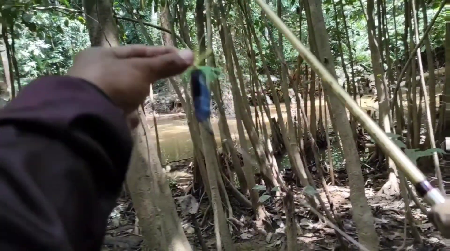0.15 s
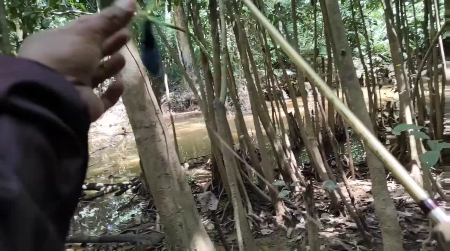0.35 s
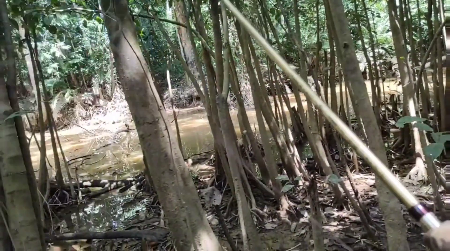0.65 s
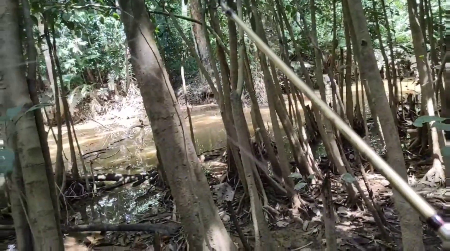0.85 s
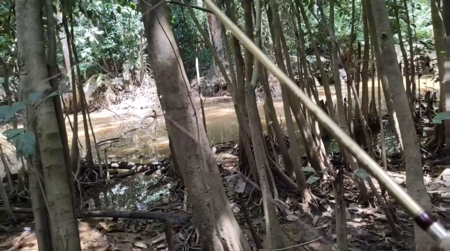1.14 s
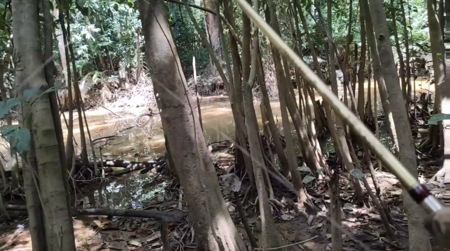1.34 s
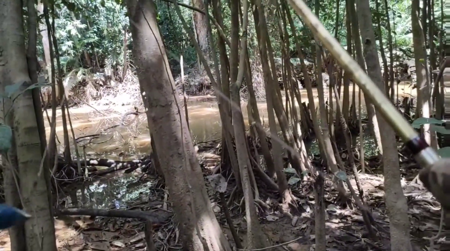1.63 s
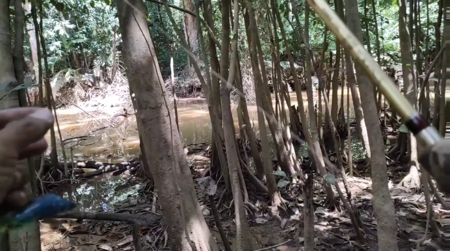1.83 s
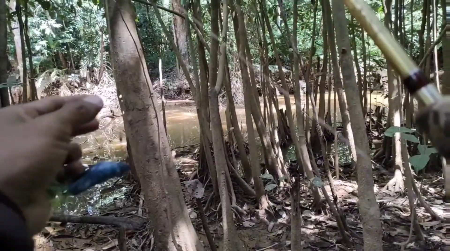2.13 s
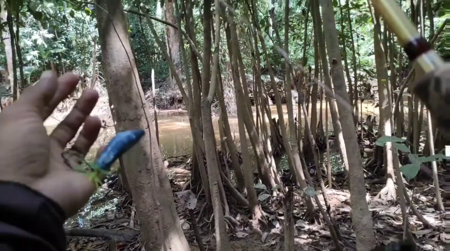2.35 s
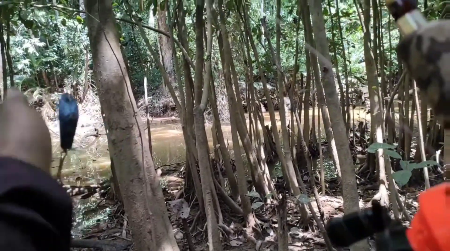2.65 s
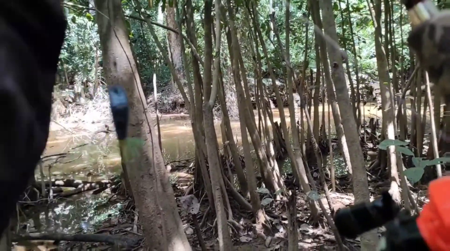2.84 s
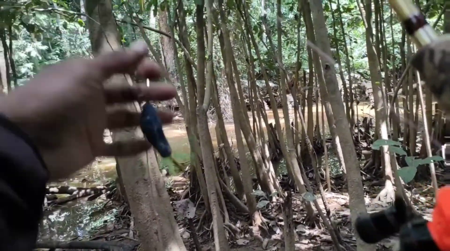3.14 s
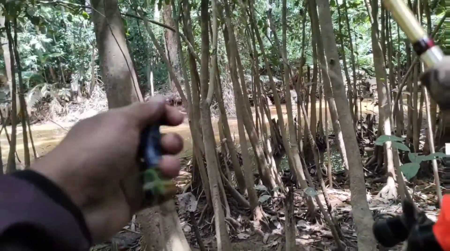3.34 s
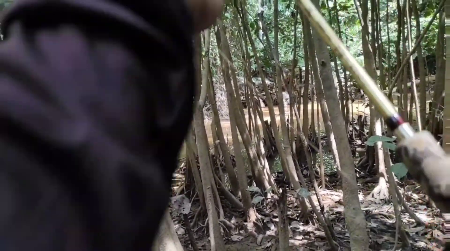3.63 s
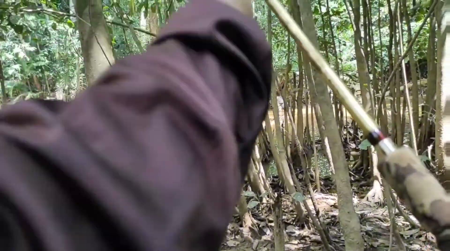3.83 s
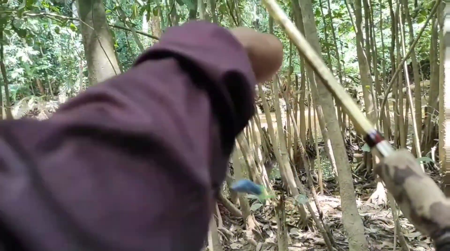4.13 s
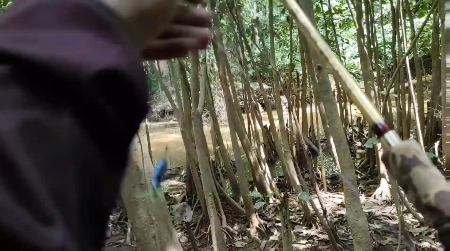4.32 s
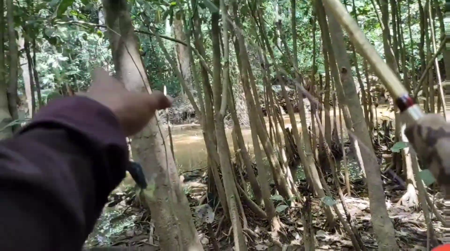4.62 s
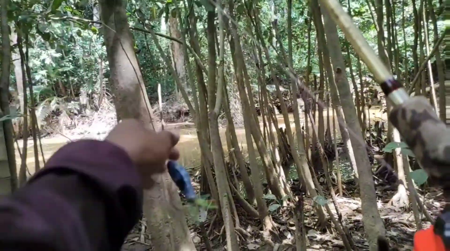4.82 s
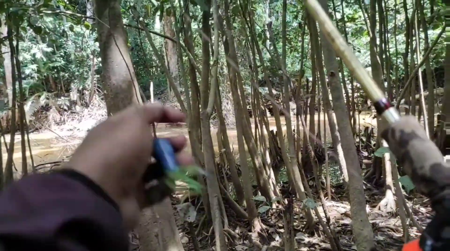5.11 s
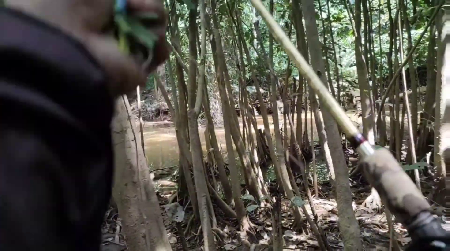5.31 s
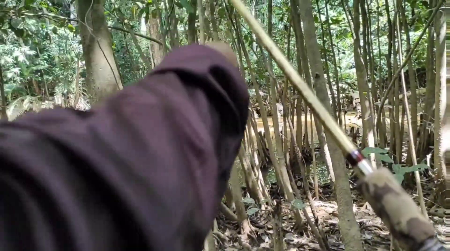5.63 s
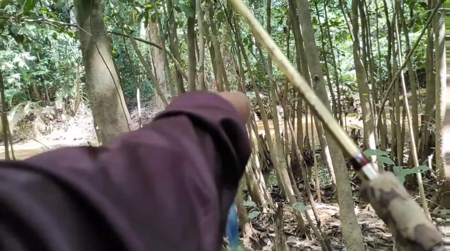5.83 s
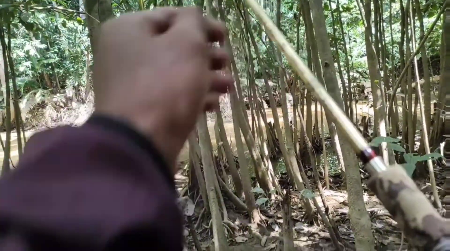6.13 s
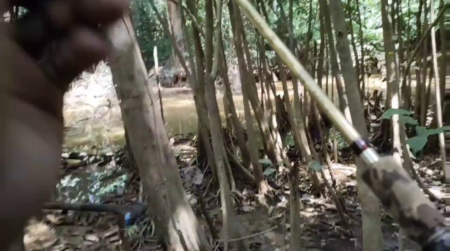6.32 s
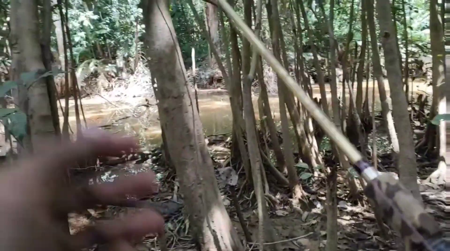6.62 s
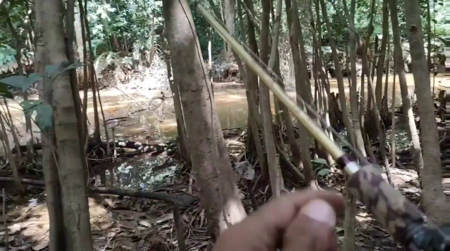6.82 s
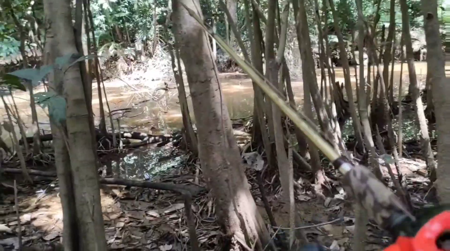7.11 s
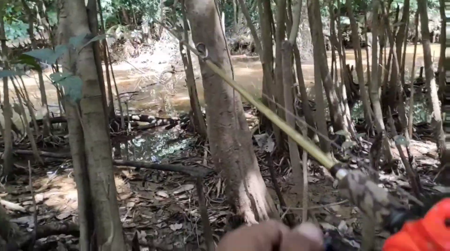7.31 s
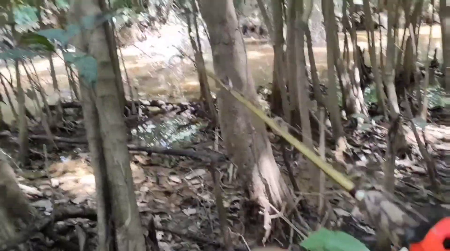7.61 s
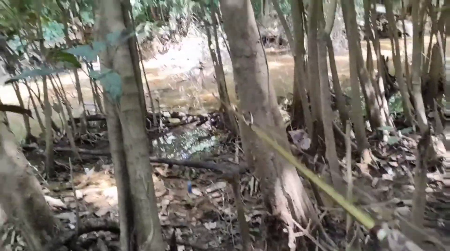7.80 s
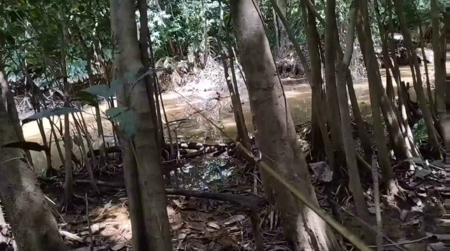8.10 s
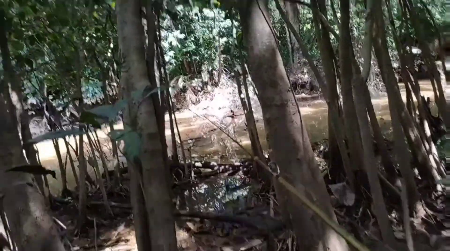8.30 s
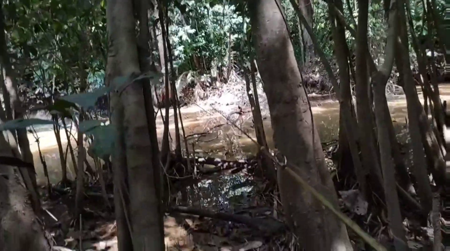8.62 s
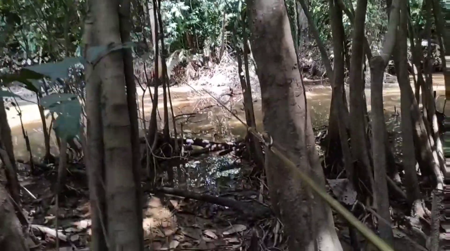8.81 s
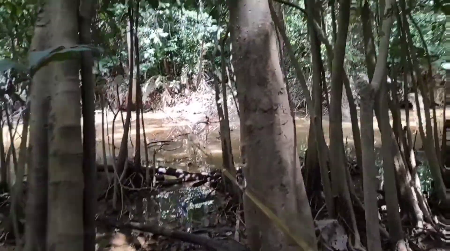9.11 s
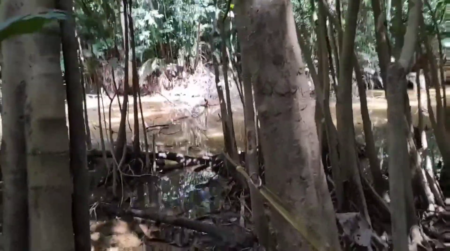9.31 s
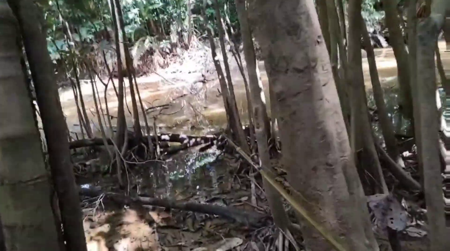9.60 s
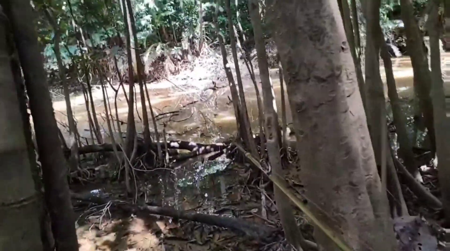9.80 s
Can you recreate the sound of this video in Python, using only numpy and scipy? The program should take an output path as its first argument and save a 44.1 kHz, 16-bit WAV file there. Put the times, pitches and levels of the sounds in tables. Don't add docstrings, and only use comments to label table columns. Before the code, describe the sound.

Outdoors among trees, insects hold a piercing, shimmering high drone throughout. Handling of line and lure is nearly silent, with a few light clicks and a barely audible thin squeak around three seconds. Later a bright metal reel clack breaks out close by, followed by uneven leaf crunches and dry twig cracks. A remote motor hums weakly underneath. Small camera microphone, centred, with slightly grainy treble.

```python
import sys
import numpy as np
from scipy import signal
from scipy.fft import rfft, irfft, next_fast_len
from scipy.io import wavfile
from scipy.ndimage import uniform_filter1d, minimum_filter1d, map_coordinates

SR = 44100
rng = np.random.default_rng(int(sys.argv[2]) if len(sys.argv) > 2 else 0)


def natural_amplitude(level_db):
    exponent = np.asarray(level_db, float) / 20
    return 10 ** exponent


def store_wav(level_fs):
    pcm = np.round(np.clip(np.atleast_2d(level_fs), -1, 1) * 32767)
    wavfile.write(sys.argv[1], SR, pcm.T.astype(np.int16))


N = 438794

# time in seconds, level in dB.
CHORUS_LEVEL = [(0.0, -51), (0.64, -50), (1.41, -51), (2.49, -50.5), (3.07, -51.5), (3.63, -50.5),
                (4.18, -51.5), (4.57, -50.5), (6.15, -51), (7.09, -50), (7.34, -51.5), (7.87, -49),
                (8.12, -51.5), (9.25, -49.5), (9.95, -49.5)]
# frequency in Hz, density
# in dB per Hz.
CHORUS_COLOUR = [(5000, -36.5), (5600, -28), (5900, -24), (6160, -21.5), (6500, -11), (6840, -2.5),
                 (7280, 2), (7550, -3), (7720, -6.5), (7880, -1.5), (8150, -13), (8440, -20.5),
                 (8800, -25.5), (9100, -35.5), (9600, -67)]
# frequency in Hz, density in dB per Hz.
OVERTONE_COLOUR = [(9500, -29.5), (10500, -5.5), (11400, -4), (12000, -1.5), (12800, -6), (13300, 5.5),
                   (14100, 6), (15000, -1), (15200, -5), (15700, -14)]
# start in seconds, body peak in dB, body pitch in Hz,
# port ring in dB re body.
GEAR = [(0.36, -72, 960, -4), (0.5112, -68, 1310, -11), (2.8325, -62, 2670, 6), (3.1475, -68.5, 1490, 19.5),
        (3.2443, -45.5, 1270, 7), (3.2446, -45.5, 3050, -7), (3.2449, -47.5, 4600, -17),
        (3.547, -53, 4830, -5), (3.841, -64, 5400, 7), (5.149, -66, 960, 14), (5.5576, -78, 1040, 18.5),
        (5.8494, -72, 975, 13), (6.6253, -56, 4140, 14), (6.634, -62, 2170, 0), (6.645, -54, 4300, 10),
        (6.655, -66, 1730, 0)]
# start in
# seconds, body peak in dB, body pitch in Hz, port ring in dB re body.
TWIGS = [(7.170, -45, 1200, -10), (7.181, -47, 1510, -10), (7.205, -47, 900, -10), (7.2454, -59, 1920, 15),
         (7.4828, -62.5, 1940, 15.5), (7.5508, -45.5, 4930, -1), (7.5954, -57, 3920, 10),
         (7.6675, -51, 915, -3), (7.7143, -51, 900, -3), (7.7538, -49.5, 890, -4), (7.8234, -60, 1310, 16),
         (7.9457, -60, 1360, 1), (8.148, -49, 900, -6), (8.405, -65, 2200, 6), (8.4530, -55, 2030, 9),
         (8.4575, -54, 2100, 15), (8.4545, -43, 930, 3), (8.44, -52, 720, -5), (8.94, -62, 930, 0),
         (8.954, -61, 620, 0), (8.493, -56, 2200, 15), (8.507, -57, 2400, 6), (8.519, -57, 2000, 12),
         (8.5404, -58.5, 1680, 15), (8.6716, -37, 950, -14), (8.694, -58, 1500, 6), (8.705, -62, 1300, 0),
         (8.7222, -49, 2600, 14), (8.7252, -42.5, 1900, 17), (8.7295, -54, 2500, 14), (8.978, -60, 910, -2),
         (9.332, -57, 1100, 9), (9.3723, -46, 1270, 4.5), (9.402, -58, 1000, 14), (9.4167, -46, 2300, 17),
         (9.419, -46, 980, -6), (9.343, -52, 1180, 3), (9.361, -52, 1300, 6), (9.409, -52, 1000, 6),
         (9.4425, -39, 1800, -14), (9.4455, -45, 2300, -4), (9.431, -50, 1200, 6), (9.526, -45, 890, 0),
         (9.587, -54, 740, 3), (9.646, -56, 960, 0), (9.618, -52, 1590, 4), (9.6669, -62, 964, 7)]
# frequency in Hz, gain in dB.
PORT_COLOUR = [(200, -16), (1500, -5), (4000, -5), (5800, -3), (7400, -4), (8600, 5), (9600, -24),
               (10500, -30), (12200, -20), (15500, -25)]
# start in seconds, ring peak in dB, ring pitch in Hz,
# frame in dB re ring.
LATCH = [
    (7.1062, -23.5, 7900, -32),
    (7.1615, -34, 8000, -14),
    (7.1678, -28.5, 7600, -20),
    (7.1744, -11, 7800, -16),
    (7.1088, -37, 7600, -18),
    (7.1808, -30, 7700, -20),
    (7.2023, -24, 7500, -11),
    (7.2152, -35, 6800, -8),
    (7.2196, -33, 7700, -18),
    (7.2223, -20, 7300, -22),
]
# frequency in Hz, level in dB.
FRAME_MODES = [(420, -10.5), (700, -20), (1300, -5.5), (1990, -6.5), (2700, -5.5), (3510, -5), (5520, -7)]
# full weight in seconds, load time in seconds,
# unload time in seconds, level in dB, dryness in dB.
TREADS = [(7.361, 0.23, 0.39, -64.5, -4), (7.64, 0.065, 0.031, -57.5, -2.5), (7.8, 0.068, 0.015, -53, -4.5),
          (7.971, 0.056, 0.064, -64, -3.5), (8.461, 0.0071, 0.012, -57.5, 1), (8.54, 0.13, 0.1, -60, -5),
          (8.699, 0.04, 0.0096, -65.5, 0), (8.734, 0.0097, 0.036, -73.5, 6.5), (9.0, 0.19, 0.091, -68, -1),
          (9.359, 0.021, 0.089, -62, -1.5), (9.41, 0.067, 0.03, -61.5, -1),
          (9.451, 0.036, 0.0094, -55.5, -2), (9.63, 0.15, 0.051, -58.5, -4),
          (9.7, 0.067, 0.11, -59.5, -5.5), (9.86, 0.032, 0.045, -77, -16)]
# low edge in Hz, high edge in Hz, level in dB, share of dryness as a factor.
LEAF_RANGES = [(346, 1686, -0.5, 0.078), (1503, 5200, 3, 2.05), (8640, 15000, -6.5, 2)]
# start in seconds, peak in dB, pitch in Hz.
TICKS = [(0.1735, -58, 9070), (3.544, -56, 9250), (3.8422, -66, 12000), (3.15, -78, 11500),
         (4.0694, -59, 9100), (5.1632, -72.5, 12400), (5.5573, -62, 11800), (5.8494, -68, 11600),
         (6.625, -51, 8700), (7.4824, -52, 9300), (7.5524, -47, 9170)]
# time in seconds, pitch in Hz.
SQUEAK_PATH = [
    (3.06, 13700),
    (3.085, 14700),
    (3.11, 15100),
    (3.135, 14600),
    (3.155, 14750),
    (3.195, 14100),
]
# time in seconds, pitch in Hz.
FALLING_PATH = [
    (3.14, 13300),
    (3.175, 12400),
    (3.23, 11500),
]
# multiple of the firing rate, level in dB.
ENGINE_ORDERS = [(1, -1), (2, -0.5), (3, -5), (4, -8), (5, 2.5), (6, 5), (7, 5.5), (8, -1), (9, -5),
                 (10, 3), (11, -1.5), (12, -9), (13, -3), (14, -10), (15, -10.5), (16, -7), (17, -10),
                 (18, -14.5), (19, -18), (20, -15), (22, -18), (24, -22), (26, -17.5), (28, -16)]
# time in seconds, level in dB.
HUM_LEVEL = [(0.0, -66), (1.4, -63), (2.4, -62.5), (3.5, -61.5), (4.7, -63), (6.0, -61.5), (7.0, -65.5),
             (7.5, -66), (8.45, -62), (9.06, -66), (9.64, -62), (9.95, -64)]
# centre in seconds, multiple of the firing rate,
# lift in dB, length in seconds.
CARRIED = [(0.302, 7, 7, 0.27), (0.634, 6, 7.5, 0.09), (1.25, 10, 9, 0.4), (1.385, 6, 9, 0.07),
           (1.87, 6, 6.5, 0.031), (2.4, 6, 10, 0.22), (2.504, 7, 3, .35), (3.3, 6, 5.5, .2),
           (3.297, 13, 4, .25), (3.405, 5, 2, 0.53), (4.2, 6, 5.5, 0.18), (5.1, 7, 4, .2),
           (5.102, 10, 2, 0.27), (5.6, 11, 5, 0.39), (6.007, 6, 3.5, .2), (6.0, 10, 4, 0.34),
           (6.205, 9, 11.5, .4), (6.83, 7, 8, 0.079), (6.91, 6, 9, 0.13), (3.898, 8, -1, 0.43)]
# centre in seconds, level in dB, length in seconds.
SWELLS = [
    (0.413, -73.5, 0.051),
    (1.84, -71.5, 0.057),
    (3.136, -66, 0.091),
    (4.507, -66.5, 0.13),
    (5.916, -68, 0.1),
]
# frequency in Hz, density in dB per Hz.
SWELL_COLOUR = [(200, -20), (340, 0), (600, -6), (1200, -10), (2200, -22), (3500, -45)]
# frequency in Hz, density in dB per Hz.
AIR_COLOUR = [(3, -10), (6, 4), (15, -2), (29, -8), (40, -13), (110, -15), (190, -12), (300, -10.5),
              (590, -13.5), (850, -21), (1470, -30), (2330, -30.5), (3150, -34), (4900, -34), (5350, -40),
              (5800, -35), (7500, -50)]
# frequency in Hz, margin under neighbours in dB, threshold of hearing in dB.
MASKING = [(1000, -12, -150), (2000, -4.5, -140), (3000, -2, -130), (4600, -1, -125), (5300, .5, -122),
           (5800, -1, -120), (6500, -8, -116), (8200, -8, -112), (8800, -1.5, -99), (9400, -1, -105),
           (11000, -1, -109), (11600, 0, -113), (12800, .5, -114), (14000, -.5, -116), (15000, -2, -114),
           (15300, -1, -110)]


def evened(x):
    return x / np.sqrt(np.mean(x ** 2) + 1e-20)


def curve(rows):
    rows = np.array(rows)
    return natural_amplitude(np.interp(np.arange(N) / SR, rows[:, 0], rows[:, 1], left=-200, right=-200))


def coloured(x, points):
    size = next_fast_len(x.shape[-1])
    hz, db = np.transpose(points)
    bins_hz = np.fft.rfftfreq(size, 1 / SR)
    gain = natural_amplitude(np.interp(np.log(bins_hz + 1), np.log(hz + 1), db, left=-120, right=-120))
    return irfft(rfft(x, size) * gain, size)[..., :x.shape[-1]]


def band(x, low_hz, high_hz):
    return signal.sosfilt(signal.butter(2, [low_hz, high_hz], "bandpass", fs=SR, output="sos"), x)


def wander(per_s):
    knots = rng.standard_normal(400)
    coarse = np.arange(0, N + 64, 64)
    slow = map_coordinates(knots, [coarse / SR * per_s * 2], order=2)
    return np.interp(np.arange(N), coarse, evened(slow))


def add(mix, s, sound):
    part = mix[round(s * SR):][:len(sound)]
    part += sound[:len(part)]


def burst(noise, t60, rise=0.0003):
    t = np.arange(len(noise)) / SR
    puff = noise * natural_amplitude(-60 * t / t60) * (1 - np.exp(-t / rise))
    return puff / abs(puff).max()


def singer(hz, per_s, jitter, t60):
    turns = np.cumsum(per_s * (1 + jitter * wander(12))) / SR
    clicks = np.diff(np.floor(turns), prepend=0) * natural_amplitude(4.9 * rng.standard_normal(N))
    t = np.arange(1024) / SR
    ring = natural_amplitude(-60 * t / t60) * np.sin(2 * np.pi * hz * t)
    return evened(signal.oaconvolve(clicks, ring)[:N])


def chorus(count=10, near=0.25):
    pitches_hz = np.linspace(6435, 8830, count)
    clicks_per_s = rng.permutation(np.geomspace(110, 280, count))
    close = sum(singer(hz, per_s, jitter=0.03, t60=0.006) * natural_amplitude(3.2 * wander(3.0))
                for hz, per_s in zip(pitches_hz, clicks_per_s))
    far = band(rng.standard_normal(N), 4500, 10500) * natural_amplitude(0.23 * wander(3.2))
    both = near * evened(close) + evened(far)
    top = coloured(rng.standard_normal(N), OVERTONE_COLOUR) * natural_amplitude(0.29 * wander(5.6))
    return curve(CHORUS_LEVEL) * evened(coloured(both, CHORUS_COLOUR)) + natural_amplitude(-81.5) * evened(top)


def snap(db, hz, ring_db, shorter, noise):
    t = np.arange(3000) / SR
    t60 = shorter * 0.054 * (hz / 1000) ** 0.4 * np.exp(-0.11 * (db + 47.5))
    sag_s = 0.00104 * (1 - np.exp(-t / 0.003))
    tone = np.sin(2 * np.pi * hz * (t + sag_s))
    body = burst(tone + 1.5 * evened(band(noise[0], hz / 1.32, hz * 1.37)), t60, rise=1.2 / hz)
    split = burst(band(noise[0], hz, hz * 2.42), 0.59 * t60)
    port = 1.1 * np.sin(2 * np.pi * 7380 * t)
    crack = burst(evened(coloured(noise[1], PORT_COLOUR)) + port, 0.24 * t60)
    thud = burst(band(noise[2], 450, 1100), 1.5 * t60, rise=0.003)
    thud_db = -64 + 0.4 * (db + 50)
    return natural_amplitude(db) * (body + natural_amplitude(-5.5) * split + natural_amplitude(ring_db) * crack) + natural_amplitude(thud_db) * thud


def snaps():
    out = np.zeros(N)
    for rows, shorter in ((GEAR, 0.35), (TWIGS, 1)):
        for (s, db, hz, ring_db), noise in zip(rows, rng.standard_normal((len(rows), 3, 3000))):
            add(out, s, snap(db, hz, ring_db, shorter, noise))
    return out


def trunks(x, t60=0.19):
    t = np.arange(SR // 2) / SR
    return evened(signal.oaconvolve(x, rng.standard_normal(len(t)) * natural_amplitude(-60 * t / t60))[:N])


def latch(count=4):
    out, t, t60 = np.zeros(N), np.arange(2000) / SR, 0.005
    rattle = [(7.1734 - k * 0.0011, -16 - 2.8 * k, 6900, -18) for k in range(count)]
    strikes = list(LATCH) + rattle
    frame = sum(natural_amplitude(db) * np.sin(2 * np.pi * hz * t) for hz, db in FRAME_MODES)
    for (s, db, hz, frame_db), noise in zip(strikes, rng.standard_normal((len(strikes), 2000))):
        ring = burst(np.sin(2 * np.pi * hz * t) + 0.58 * evened(coloured(noise, PORT_COLOUR)), t60)
        ring = band(band(ring, 5200, 15500), 3500, 15500)
        add(out, s, natural_amplitude(db) * (ring + natural_amplitude(frame_db) * burst(frame, 1.85 * t60, rise=0.00041)))
    rms = np.linalg.norm(out) / np.sqrt(N)
    return out + natural_amplitude(-17.5) * rms * trunks(out, t60=0.16)


def weight(t, share):
    power = 0
    for s, load_s, unload_s, db, dry_db in TREADS:
        away = np.where(t < s, (s - t) / load_s, (t - s) / unload_s)
        power = power + natural_amplitude(db + share * dry_db - 8.5 * away ** 0.75) ** 2
    return np.sqrt(power)


def leaves(per_s=1300, spread_db=3.0, count=24):
    first_step_s = 7
    n = N - first_step_s * SR
    t, out = np.arange(900) / SR, np.zeros(N)
    for low_hz, high_hz, db, share in LEAF_RANGES:
        size = natural_amplitude(spread_db * np.minimum(rng.exponential(1, n), 5)) * (rng.random(n) < per_s / SR)
        kind = rng.integers(0, count, n)
        cracks = np.zeros(n)
        for j, hz in enumerate(np.geomspace(low_hz, high_hz, count)):
            ring = np.sin(2 * np.pi * hz * t) * natural_amplitude(-60 * t / 0.011)
            cracks += natural_amplitude(4 * wander(20)[:n]) * signal.oaconvolve(size * (kind == j), ring)[:n]
        shuffle = band(rng.standard_normal(n), low_hz, high_hz)
        crush = natural_amplitude(1.73 * wander(30)[:n]) * (evened(cracks) + 1.18 * evened(shuffle))
        gain = natural_amplitude(db) * weight(first_step_s + np.arange(n) / SR, share)
        add(out, first_step_s, gain * evened(crush))
    return out


def ticks():
    out = np.zeros(N)
    for (s, db, hz), noise in zip(TICKS, rng.standard_normal((len(TICKS), 2000))):
        add(out, s, natural_amplitude(db) * burst(band(noise, hz / 1.11, hz), 0.098))
    return out


def squeak(path, db):
    out, (s, hz) = np.zeros(N), np.transpose(path)
    t = np.arange(s[0], s[-1], 1 / SR)
    whistle = np.sin(2 * np.pi * np.cumsum(np.interp(t, s, hz)) / SR)
    add(out, s[0], natural_amplitude(db) * np.sqrt(np.hanning(len(t))) * whistle)
    return out


def carried_db(order):
    t = np.arange(0, N + 512, 512) / SR
    lift_db = np.zeros(len(t))
    for s, multiple, db, length_s in CARRIED:
        if round(multiple) == round(order):
            lift_db += db * np.exp(-0.5 * ((t - s) / length_s) ** 2)
    return np.interp(np.arange(N) / SR, t, lift_db)


def engine():
    turns = np.cumsum(29.21 * (1 + 0.002 * wander(0.5))) / SR
    orders = []
    for k, db in ENGINE_ORDERS:
        tone = np.sin(2 * np.pi * (k * turns + rng.random()))
        orders.append(natural_amplitude(db + carried_db(k) + 1.3 * wander(1.372)) * tone)
    deep, upper = evened(sum(orders[:4])), evened(sum(orders[4:]))
    deep_db = -67.5 - 0.48 * np.arange(N) / SR
    return natural_amplitude(-2.5) * curve(HUM_LEVEL) * upper + natural_amplitude(deep_db) * deep


def air():
    t = np.arange(N) / SR
    lift = sum(natural_amplitude(db) * np.exp(-0.5 * ((t - s) / length_s) ** 2) for s, db, length_s in SWELLS)
    breeze = evened(coloured(rng.standard_normal(N), SWELL_COLOUR))
    wash = evened(coloured(rng.standard_normal(N), AIR_COLOUR))
    return lift * natural_amplitude(2 * wander(18)) * breeze + natural_amplitude(-66.5 + wander(3)) * wash


def scene():
    near = snaps() + latch() + leaves() + ticks() + squeak(SQUEAK_PATH, -74) + squeak(FALLING_PATH, -81)
    mono = chorus() + near + engine() + air()
    return np.array([mono, mono])


def masked(x):
    window = np.sqrt(signal.windows.hann(2048, sym=False))
    hz, _, z = signal.stft(x, SR, window, nperseg=2048)
    power = abs(z[0]) ** 2
    cell_db = 10 * np.log10(uniform_filter1d(power, size=9, axis=0) + 1e-20)
    around_db = uniform_filter1d(cell_db, size=51, axis=0)
    whim_db = 2.6 * evened(uniform_filter1d(rng.standard_normal(power.T.shape), size=12).T)
    table_hz, margin_db, hearing_db = np.transpose(MASKING)
    margin_db = np.interp(hz, table_hz, margin_db)[:, None] + whim_db
    hearing_db = np.interp(hz, table_hz, hearing_db)[:, None] + whim_db
    middle = power[(hz > 1500) & (hz < 5000)].sum(0)
    struck = middle > 6 * minimum_filter1d(middle, size=5)
    keep = ((cell_db > around_db + margin_db) | struck) & (cell_db > hearing_db)
    return signal.istft(z * keep, SR, window, nperseg=2048)[1][:, :N]


def roll_off(x):
    return signal.sosfilt(signal.butter(12, 15600, fs=SR, output="sos"), x)


def record(dry):
    mix = masked(dry)
    return roll_off(mix)


dry = scene()
out = record(dry)
store_wav(out)
```